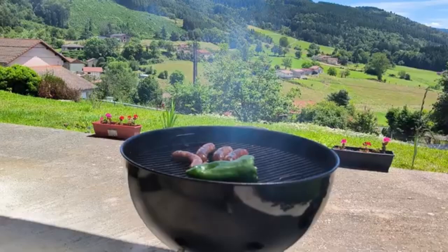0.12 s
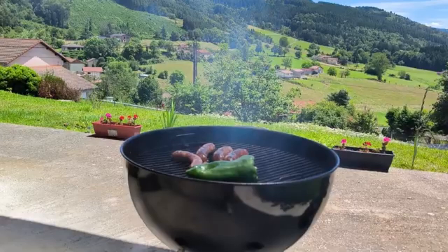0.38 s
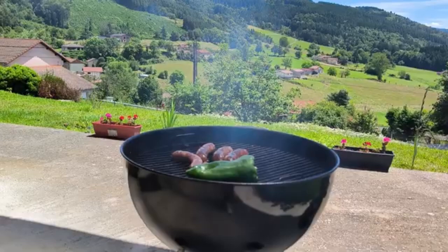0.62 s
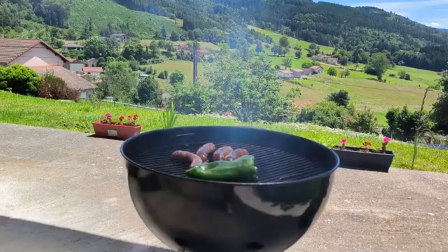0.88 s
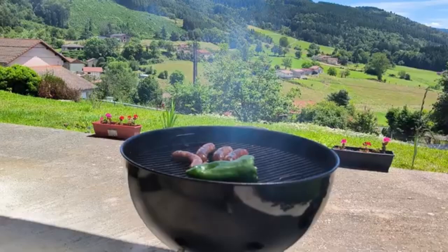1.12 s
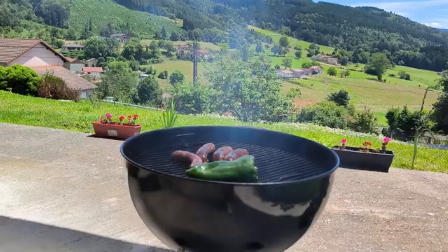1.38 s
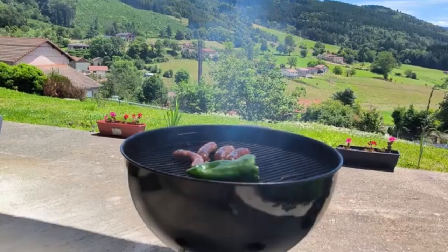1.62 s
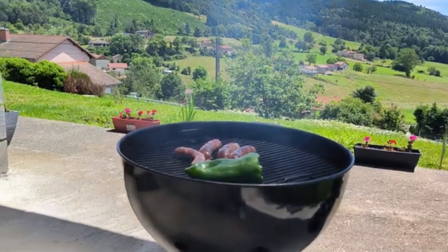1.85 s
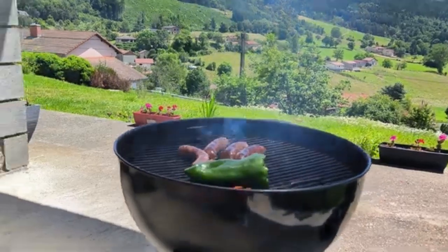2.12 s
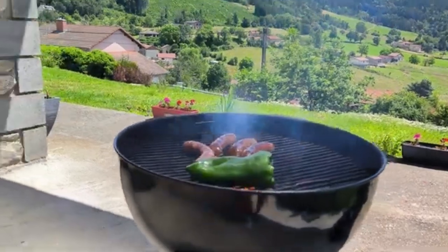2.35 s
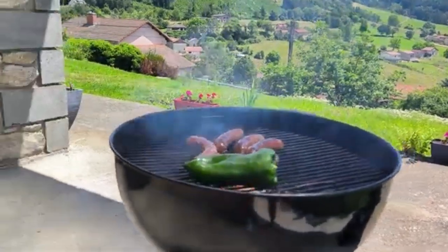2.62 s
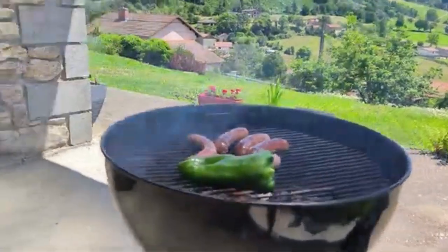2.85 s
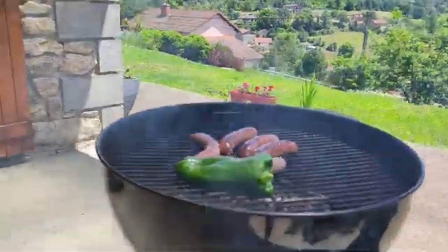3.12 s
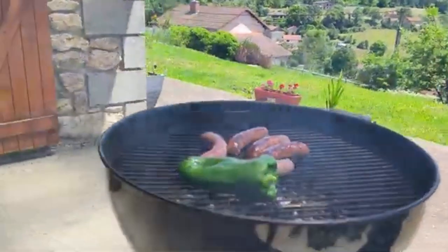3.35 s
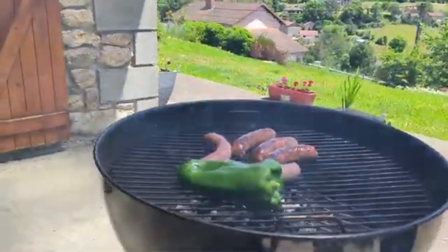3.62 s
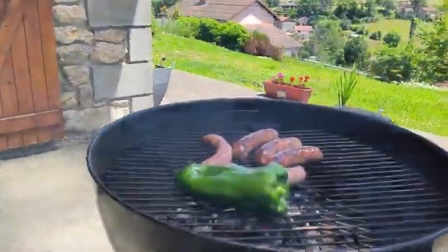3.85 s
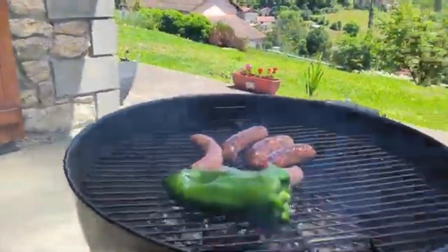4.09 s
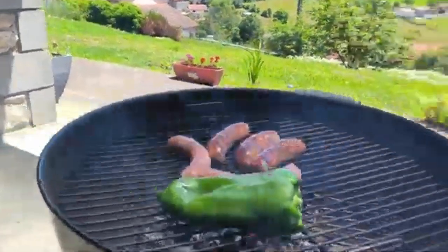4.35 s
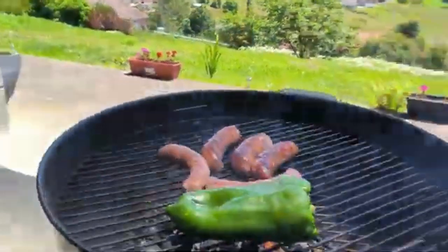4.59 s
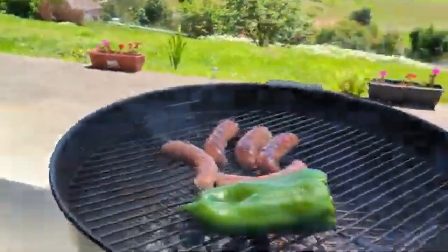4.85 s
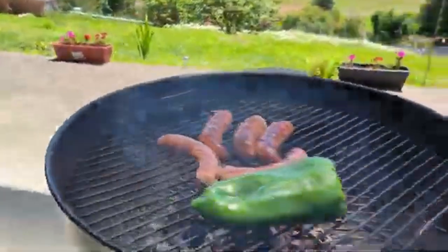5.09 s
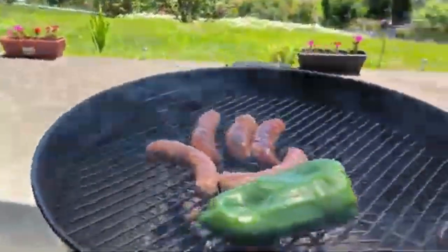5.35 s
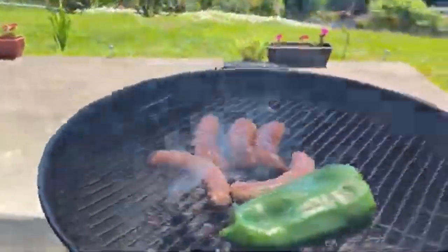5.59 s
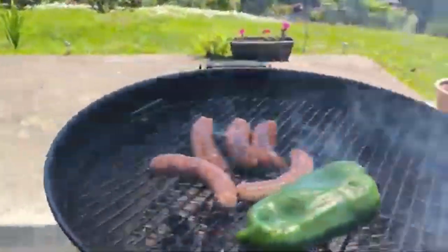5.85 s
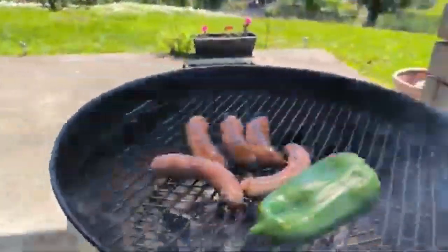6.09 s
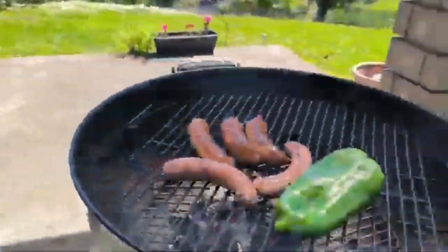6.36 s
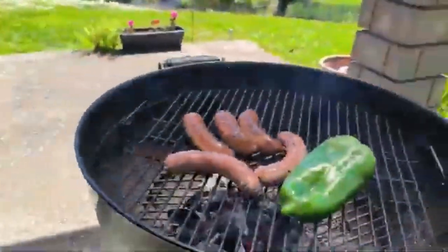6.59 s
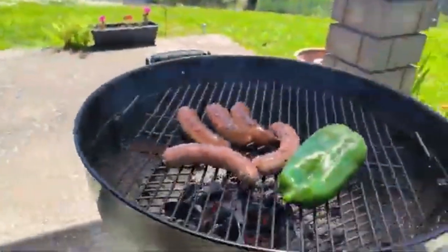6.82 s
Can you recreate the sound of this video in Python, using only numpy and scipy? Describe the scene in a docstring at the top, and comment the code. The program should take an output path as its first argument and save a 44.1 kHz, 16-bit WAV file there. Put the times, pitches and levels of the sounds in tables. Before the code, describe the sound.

Sausages and a pepper sizzle on a charcoal grill outdoors, with sharp fat spits, brief flare-up hisses and soft footsteps as the listener approaches.

```python
"""A terrace above a valley: low wash all round, and sausage fat sizzling on charcoal at a hand-held phone.
First the sizzle is softer, with scattered spits and a soft step or two; a faint far hum comes in from about 1 s.
Near 1.7 s fat flares on the coals; from 2 s soles scuff as the phone is walked up and sizzle and spits grow.
The hum is clearer after 3.2 s; the hardest spit cracks near 5.2 s, and a strong flare-up follows near 5.4 s.
Bursting bubbles, steam and spits are clicks and noise coloured by the cavities of two microphone ports."""
import sys
import numpy as np
from scipy import signal
from scipy.io import wavfile
from scipy.ndimage import uniform_filter1d

SR = 44100
rng = np.random.default_rng(int(sys.argv[2]) if len(sys.argv) > 2 else 0)


def transcribe(signal):
    """Save signal, clipped to [-1, 1], as a 16-bit WAV file at the path in sys.argv[1]."""
    frames = np.atleast_2d(signal).T
    limited = np.clip(frames, -1, 1)
    pcm = np.round(limited * 32767).astype(np.int16)
    wavfile.write(sys.argv[1], SR, pcm)


def boost(x):
    """Linear amplitude factor 10**(x/20) for a level x in decibels (scalar or array-like)."""
    u = np.asarray(x, float) / 20
    return 10 ** u


N = 306936


def evened(x):
    """Scales to rms 1."""
    return x / np.sqrt(np.mean(x ** 2) + 1e-20)


def read(points, hz):
    """Reads a spectrum on a log-frequency axis."""
    f, value = np.transpose(points)
    return np.interp(np.log(hz + 1), np.log(f + 1), value)


def curves(rows):
    """Every column of a table, interpolated at every sample."""
    s, *columns = np.transpose(rows)
    return [np.interp(np.arange(N) / SR, s, c) for c in columns]


def band(x, lo_hz, hi_hz):
    """Band-pass along the last axis."""
    edges = [lo_hz, min(hi_hz, SR / 2.1)]
    return signal.sosfilt(signal.butter(2, edges, "band", fs=SR, output="sos"), x)


def add(mix, s, sound):
    """Mixes a sound in at time s."""
    part = mix[..., round(s * SR):][..., :sound.shape[-1]]
    part += sound[..., :part.shape[-1]]


def slow(hz):
    """Smooth chance of rms 1 that wanders up to about hz times a second."""
    width = round(SR / hz)
    return evened(uniform_filter1d(uniform_filter1d(rng.standard_normal(N), width), width))


def panned(db):
    """Left and right gains for a level difference."""
    return boost(np.multiply.outer([.5, -.5], db))


# Spectrum of the low wash of the valley, relative: (frequency [Hz], density [dB per Hz])
WASH_SPECTRUM = [(15, -40), (30, -32), (50, -36), (66, -15), (87, 6.5), (108, 1.5), (201, 4.5), (485, -4),
                 (547, -3.5), (800, -11), (1780, -16.5), (1970, -11.5), (2460, -19), (3000, -8),
                 (3900, -16.5), (6600, -120)]
# How alike the wash is at the two microphone ports: (frequency [Hz], left-right likeness [-1 to 1])
WASH_LIKENESS = [(40, 0.05), (90, 0.47), (150, 0.65), (400, 0.54), (1200, 0.046), (3000, 0.1)]


def wash():
    """Low outdoor noise with drifting patches in time and pitch, partly alike at both ports."""
    frames, hz = N // 256 + 5, np.fft.rfftfreq(1024, 1 / SR)
    a, b, c, d, patches = rng.standard_normal((frames, 513, 5)).T
    patches = evened(uniform_filter1d(uniform_filter1d(patches, 6, 0), 14, 1))
    same = np.clip(read(WASH_LIKENESS, hz), -1, 1)[:, None]
    left = a + 1j * b
    right = same * left + np.sqrt(1 - same ** 2) * (c + 1j * d)
    spectra = np.array([left, right]) * boost(read(WASH_SPECTRUM, hz)[:, None] + 1.9 * patches)
    noise = signal.istft(spectra, nperseg=1024, noverlap=768)[1][:, :N]
    return boost(-60) * evened(noise)


# The far hum, before its random waver: (time [s], frequency [Hz], rms level [dB])
HUM_TRACK = [(0, 121, -99), (1.1, 120.7, -70.5), (2.3, 123.3, -75), (2.7, 121, -74), (2.95, 120.8, -71),
             (3.2, 120, -71), (3.4, 120.8, -66), (3.9, 122, -67.5), (4.6, 123, -63.5), (5.1, 121.2, -72),
             (6.0, 123.5, -63.5), (6.96, 123.9, -71.5)]


def hum():
    """A far low sine whose pitch and level waver slightly."""
    waver_db, waver_hz = 1.6, 1.2  # rms of the wavers
    hz, db = curves(HUM_TRACK)
    level = np.sqrt(2) * boost(db + waver_db * slow(4.9))
    turns = np.cumsum(hz + waver_hz * slow(8.8)) / SR
    return level * np.sin(2 * np.pi * turns)


# Soft steps and knocks on the terrace:
# (listed time [s], thud envelope peak [dB], thud pitch [Hz], thud length [cycles], click over thud [dB])
FOOTSTEPS = [(0.186, -48, 408, 3.2, -6), (1.89, -38, 414, 1.25, -19), (2.1, -49, 271, 3.4, -12),
             (2.636, -33, 257, 2.45, 0.5), (2.657, -42, 223, 1.3, -16), (2.801, -39.5, 222, 1.5, -20),
             (2.961, -46, 279, 3.6, -13), (3.116, -50, 230, 3.7, -13), (3.161, -45.5, 247, 3.5, -12),
             (4, -49.5, 236, 2.3, -3), (4.204, -41.5, 416, 1.7, -6), (4.475, -41, 387, 2.7, -11),
             (4.577, -42, 236, 3.4, -3.5), (5.012, -54, 233, 6.5, -15), (5.215, -45, 386, 4.5, -12),
             (5.597, -39, 202, 1.7, -27), (5.677, -47.5, 166, 3, -14), (5.805, -47.5, 385, 6, 4.5),
             (6.148, -49, 260, 1.3, -10), (6.184, -50, 200, 1.1, 3), (6.205, -54, 198, 1.9, -10),
             (6.231, -46.5, 190, 1.7, -9), (6.852, -42.5, 128, 1, -28)]


def steps():
    """A few cycles of a dull thud with a higher hollow click; the house wall throws it back."""
    out, t = np.zeros(N), np.arange(4000) / SR
    for listed, db, hz, cycles, click_db in FOOTSTEPS:
        # the thud starts 2 ms after the listed time
        thud_start = listed + 0.00199
        u = t * hz / max(cycles, .5) * 3
        add(out, thud_start, boost(db) * u * np.exp(1 - u) * np.sin(2 * np.pi * hz * t))
        ring = np.sin(2 * np.pi * 560 * t) * boost(-60 * t / 0.035)
        click = ring + 9.6 * band(1. * (t == 0), 330, 990)
        add(out, thud_start + 0.00244, boost(db + click_db) * click / abs(click).max())
    # the reply starts after 15 ms and is mostly alike at both ports
    late = np.arange(SR // 3) / SR
    tail = rng.standard_normal((2, len(late))) * boost(-60 * late / 0.72) * (late > .015)
    tail = tail[:1] + 0.21 * tail
    tail /= np.linalg.norm(tail[0])
    return out + boost(-8.0) * signal.fftconvolve(out[None], tail, axes=1)[:, :N]


# Shoes dragging on the paving: (start [s], length [s], low rumble at full press [dB], grit at full press [dB])
SHOE_DRAGS = [(2.033, 0.83, -62.5, -68.5), (2.632, 0.046, -54, -61), (2.768, 0.1, -61, -86),
              (2.949, 0.082, -55, -84), (3.095, 0.24, -70, -85), (4.457, 0.051, -76, -60),
              (4.505, 0.19, -52, -63.5), (4.854, 0.45, -57, -64.5), (5.176, 0.23, -58, -66),
              (5.373, 0.38, -54, -60.5), (5.788, 0.11, -60, -63), (6.143, 0.018, -66, -53),
              (6.158, 0.025, -60, -54), (6.176, 0.06, -64, -57.5)]


def scuffs():
    """Lumpy low noise and rough grit while a sole drags."""
    rise_share = 0.25  # share of a scuff spent rising
    t, (rumble, grit) = np.arange(N) / SR, np.zeros((2, N))
    lumps = rng.standard_normal((2, N)) * boost([1.8 * slow(46), 3.5 * slow(89)])
    low = evened(band(band(lumps[0], 160, 330), 157, 282))
    high = evened(band(band(lumps[1], 140, 930), 250, 3500))
    for start, length, low_db, high_db in SHOE_DRAGS:
        u = (t - start) / length
        press = np.clip(np.minimum(u / rise_share, (1 - u) / (1 - rise_share)), 0, 1) ** .5
        rumble += boost(low_db) * press
        grit += boost(high_db) * press
    return rumble * low + grit * high


# Steam squeaking through split skin: (start [s], peak level [dB], centre pitch [Hz], length [ms])
STEAM_SQUEAKS = [(1.344, -53, 4450, 30), (3.997, -45.5, 1760, 8.2)]


def squeaks():
    """A brief whistle of steam, made rough by a randomly shaken pitch."""
    out = np.zeros(N)
    wobble = rng.standard_normal((len(STEAM_SQUEAKS), 2000))
    for (s, db, hz, ms), w in zip(STEAM_SQUEAKS, wobble):
        n = min(round(ms * SR / 1000), 2000)
        turns = np.cumsum(hz * (1 + 1.1 * uniform_filter1d(w, 60)[:n])) / SR
        add(out, s, boost(db) * np.hanning(n) * np.sin(2 * np.pi * turns))
    return out


# Colour of each microphone port's cavity, before low cut and scaling: (frequency [Hz], relative gain [dB])
LEFT_CAVITY = [(1200, -31.5), (2200, -25.5), (3000, -23), (4200, -15.5), (5400, -11.5), (6600, -7),
               (6900, -6.5), (7800, -9.5), (8150, 0), (8380, 6), (8620, -6), (9200, -7.5), (12000, -11.5),
               (14400, -8.5)]
RIGHT_CAVITY = [(1200, -33.5), (2200, -30), (3000, -22.5), (4200, -15.5), (5700, -5), (6050, -6),
                (6600, -2), (6900, -6.5), (7400, 0), (7900, -8.5), (8450, -18.5), (8650, -26), (9500, -18),
                (9800, -21), (11500, -14), (14400, -13)]


def ports():
    """Causal minimum-phase responses of the two port cavities, scaled together."""
    hz = abs(np.fft.fftfreq(2048, 1 / SR))
    # 12 dB per octave below 1 kHz
    low_cut_db = 12 * np.log2(np.clip(hz / 1000, 1e-3, 1))
    log_gain = np.log(boost([read(p, hz) + low_cut_db for p in (LEFT_CAVITY, RIGHT_CAVITY)]))
    taps = np.fft.ifft(np.exp(np.conj(signal.hilbert(log_gain)))).real[:, :1024]
    return taps / np.linalg.norm(taps) * 2


# Drips of fat boiling off on the coals: (start [s], level [dB], rise [s], hold [s], fading t60 [s])
FAT_FLARES = [(0.1, -52.5, 0.016, 0.086, 0.56), (0.513, -45, 0.071, .03, 0.68),
              (1.496, -49.5, 0.067, 0.026, 0.97), (1.718, -39.5, 0.26, 0.11, 1.6),
              (2.74, -46, 0.12, 0.017, 0.16), (4.763, -42.5, .004, 0.033, 0.24),
              (5.405, -34, 0.094, 0.22, 0.95), (6.13, -47, .02, .01, 0.18), (6.215, -40, 0.01, .01, 0.22),
              (6.544, -45, 0.013, 0.0089, 0.15)]


def flares():
    """Power of the flare-ups: each rises, holds and dies away."""
    t, power = np.arange(N) / SR, np.zeros(N)
    for start, db, rise, hold, t60 in FAT_FLARES:
        up = np.clip((t - start) / rise, 0, 1)
        fade_db = -60 * np.maximum(t - start - rise - hold, 0) / t60
        power += (up * boost(db + fade_db)) ** 2
    return power


def spit(cavity, fizz, db, pan_db, bright_db, body_db):
    """One sharp crack with a short fizzing puff around it, coloured by the port cavities."""
    t = np.arange(600) / SR
    puff = 0.3 * fizz * np.minimum(t / .0006, 1) * np.exp(-t / .0012)
    puff[:, 20] += 1  # the crack itself
    crack = np.roll(signal.fftconvolve(puff, cavity, axes=1), 12, axis=1)
    bright = (boost(bright_db) - 1) * band(crack, 8400, 19200)
    body = (boost(body_db) - 1) * band(crack, 630, 5000)
    crack += bright + body
    # the nearer port hears it first: 0.6 samples of lag for each dB of level difference
    crack[1] = np.roll(crack[1], round(.6 * pan_db))
    return boost(db) * panned([pan_db]) * crack / abs(crack).max(1).mean()


# The loudest spits of fat:
# (start [s], peak level [dB], left-right difference [dB], brightness [dB], body [dB])
LOUD_SPITS = [(0.161, -26, -7, -8, 0), (0.2848, -27, 6, 1, 0), (0.3318, -27, 6, 1, 2),
              (0.4163, -27, 1, -10, -6), (0.429, -31, -4, -6, 4), (0.571, -30, 8, 0, 0),
              (0.5794, -23, 8, 9, -4), (0.6428, -36, 6, 4, -4), (0.8035, -33, 4, 8, -6),
              (0.821, -23.5, 2, 3, -7), (0.8584, -26, 8, -10, -10), (0.8866, -29, 8, -4, -5),
              (1.161, -25, 0, -6, 4), (1.176, -26, 2, 0, -4), (1.2048, -27, 5, -3, -2),
              (1.2245, -28, -1, -13, -2), (1.243, -33, 0, 0, -4), (1.4048, -27, -4, -16, -10),
              (2.0883, -13, 0.5, 3, -14), (2.1, -21, 1, 0, -2), (2.159, -24, 14, 2, -2),
              (2.6392, -18, -6, 4, 8), (2.872, -20, -3, 10, -1), (2.955, -22, -11, -6, 3),
              (3.087, -26.5, 11, -9, -4), (3.1966, -23, -1, 2, -3), (3.4999, -34, 2, 9, 5),
              (3.831, -21.5, -11, -1, -9), (3.8362, -20, -13, 8, -6), (3.9636, -30.5, 16, -6, 0),
              (4.0044, -20, 1, -14, 11), (4.0066, -19, -6, -12, 2), (4.0345, -32, 4, -6, -6),
              (4.1599, -21, -5, -9, -12), (4.1742, -18, -10, -14, -18), (4.363, -21.5, -6.5, 7, -4),
              (4.634, -18.5, 1, 5, -14), (4.6382, -34, -6, -3, -6), (4.6557, -23, -11, -6, -6),
              (4.6744, -24, -4, -1, -3), (4.7432, -22, -6, -10, 1), (4.751, -24, -4, -3, 7),
              (4.7675, -19, -5, 7, 0), (4.7692, -22, -5, 5, -3), (4.8814, -24, -8, -1, -7),
              (4.897, -23, -6, -5, 2), (4.9104, -23.5, -7, -1, -5), (5.022, -20.5, 1, -2, 7),
              (5.1711, -11, -4, 6.5, 4), (5.254, -16.5, -6, 0, 4), (5.2794, -24, -9, -5, 2),
              (5.33, -24, 3, 7, -3), (5.339, -16.5, -6.5, 1, 3.5), (5.4443, -18, -4, -10, -4),
              (5.494, -28, -3, 15, 0), (5.516, -36, 2, 2, -5), (5.617, -23, -4, 4, 1),
              (5.6564, -14, -7, -7, 3), (5.69, -22, -16, -4, -5), (5.7035, -30, -7, -2, -5),
              (5.735, -27, -19, -5, -5), (5.765, -15, -8, 2, -2), (6.133, -20, -8.5, -10, -9),
              (6.1388, -16.5, -5, -5, 3), (6.2291, -28, -1, -4, 2), (6.2568, -21, -11, 3, -6),
              (6.2725, -13.5, 0.5, 0, -1), (6.397, -26, -2, 4, -2), (6.461, -19.5, -9, 4, -10),
              (6.542, -30, 1, -6, -4), (6.65, -29, -6, -4, 0)]


def spits(cavity, count=520):
    """The loud spits, and small ones at random moments that follow the level of the sizzle."""
    small_per_s, small_db, spread_db = 80, 7.5, 2.2  # rate, least peak over the sizzle, spread
    out = np.zeros((2, N))
    for (s, *row), fizz in zip(LOUD_SPITS, rng.standard_normal((len(LOUD_SPITS), 2, 600))):
        add(out, s, spit(cavity, fizz, *row))
    level_db, pan_db = curves(SIZZLE_TRACK)[:2]
    level_db = 10 * np.log10(boost(level_db) ** 2 + flares())
    gaps, sizes = rng.exponential(1, (count, 2)).T
    colours, fizzes = rng.standard_normal((count, 2)), rng.standard_normal((count, 2, 600))
    times = np.cumsum(gaps) / small_per_s
    for s, size, (side, bright), fizz in zip(times, sizes, colours, fizzes):
        at = min(round(s * SR), N - 1)
        db = level_db[at] + small_db + spread_db * min(size, 2.6)
        add(out, s, spit(cavity, fizz, db, pan_db[at] + 6 * side, 6 * bright, -6 - 2 * bright))
    return out


# Steady sizzle as the phone nears and turns, before surges, wavers and flare-ups:
# (time [s], level [dB], left-right difference [dB], lift of the top treble [dB], lift of the low sizzle [dB])
SIZZLE_TRACK = [(0, -48, -2, 1.5, 3), (0.45, -48, -0.5, 2.5, 3), (0.9, -47, 1.5, 1.5, 3),
                (1.3, -47, 0.5, 1.5, 2), (1.72, -51.5, -1, 2, 5.5), (2.0, -50.5, -3, 4.5, 4.5),
                (2.5, -42.5, -2.5, 3, 2), (2.9, -43, -2, 2, 3.5), (3.3, -48, -2, 3, 0),
                (3.62, -46, -3.5, 1, 2.5), (3.85, -43, -5.5, 3, -0.5), (4.1, -42, -6, 1, -0.5),
                (4.5, -42, -2.5, 1, 3), (4.85, -44.5, -4.5, 2, 3.5), (5.1, -40.5, -2, 1.5, 2),
                (5.4, -43, -8, -0.5, 1), (5.6, -69, -0.5, -1.5, -2), (5.9, -42.5, -0.5, -1, 2.5),
                (6.1, -45.5, -4, -1, 2), (6.4, -40.5, -4, -1.5, 1), (6.75, -38, -2, 0.5, 3),
                (6.96, -39.5, -1.5, 0, 1.5)]


def sizzle(cavity, count=8):
    """Steam hiss and bursting bubbles from spots across the grate, each with its own lag between the ports."""
    surge_db, surge_hz = 1.0, 13.5  # the whole level surges at random
    waver_db, waver_hz = 1.22, 10.3  # treble and low part waver apart
    level_db, pan_db, top_db, low_db = curves(SIZZLE_TRACK)
    flare_power = flares()
    level = np.sqrt(boost(level_db + surge_db * slow(surge_hz)) ** 2 + flare_power)
    top_db = top_db + waver_db * slow(waver_hz)
    low_db = low_db + waver_db * slow(waver_hz)
    boil_db = 1.2 * slow(200)  # all the fat boils up in short clumps
    t, out = np.arange(300) / SR, np.zeros((2, N))
    for lag, hz in zip(rng.permutation(count), np.geomspace(2800, 14000, count)):
        clump_db = 3.0 * slow(110)  # each spot also clumps by itself
        bursts = rng.random(N) < 90 * boost(clump_db + boil_db) / SR
        size = boost(1.95 * np.minimum(rng.exponential(1, N), 4.5)) * rng.choice([-1, 1], N)
        bubble = np.sin(2 * np.pi * hz * t) * np.exp(-t * hz / 2.4)  # rings two or three cycles
        bubble /= np.linalg.norm(bubble)
        steam = rng.standard_normal(N) * boost(.4 * clump_db)
        spot = steam + 7.2 * signal.oaconvolve(bursts * size, bubble)[:N]
        out += [spot, np.roll(spot, 2 * (lag - count // 2))]
    out = signal.oaconvolve(evened(out) * boost(boil_db), cavity, axes=1)[:, :N]
    top = (boost(top_db) - 1) * band(out, 9640, 14000)
    low = (boost(low_db) - 1) * band(out, 380, 5430)
    out += top + low
    # flare-ups sound fuller around 7 kHz, by their share of the power
    out += boost(-7) * flare_power / level ** 2 * band(out, 6500, 8050)
    return out / out.mean(0).std() * level * panned(pan_db)


def scene():
    """Background, walker and grill at the two ports."""
    cavity = ports()
    background = wash() + hum()
    walker = steps() + scuffs()
    grill = squeaks() + spits(cavity) + sizzle(cavity)
    return background + walker + grill


def band_limit(x):
    """A steep low-pass at the top of the band."""
    return signal.sosfilt(signal.butter(12, 16360, fs=SR, output="sos"), x)


def record(dry):
    """Cuts the lowest bass below 62 Hz and band-limits the treble at 15030 Hz."""
    low_cut = signal.butter(4, 62, "high", fs=SR, output="sos")
    top_cut = signal.firwin(511, 15030, window=("kaiser", 4), fs=SR)
    mix = signal.sosfilt(low_cut, dry)
    mix = signal.oaconvolve(mix, top_cut[None], "same")
    return band_limit(mix)


dry = scene()
out = record(dry)
transcribe(out)
```